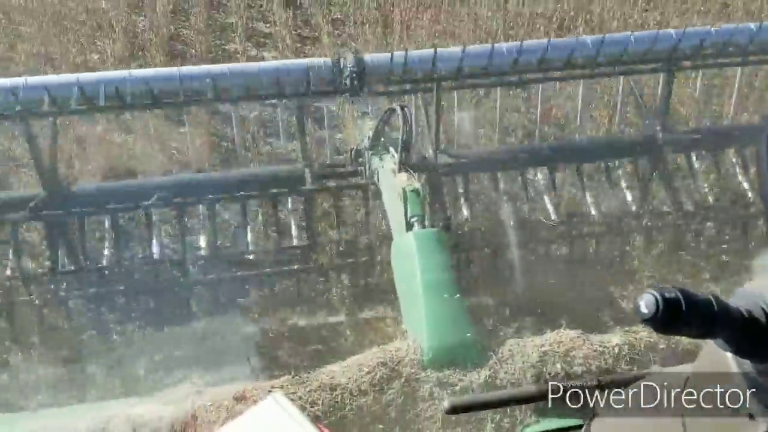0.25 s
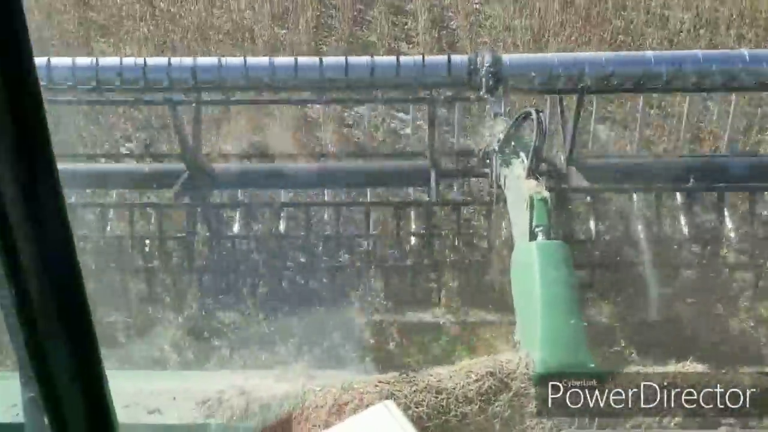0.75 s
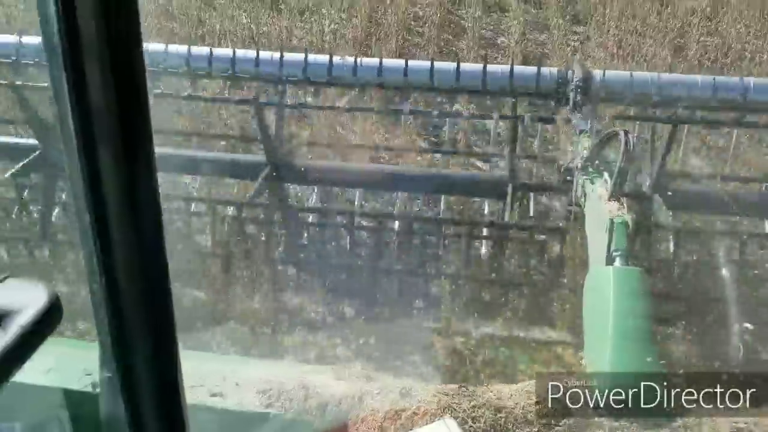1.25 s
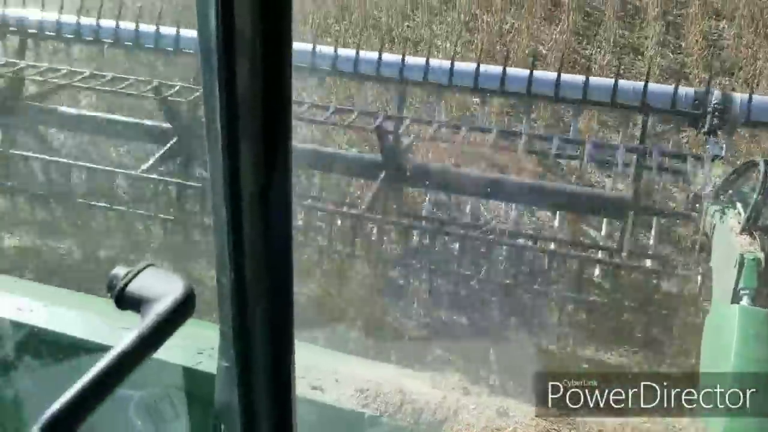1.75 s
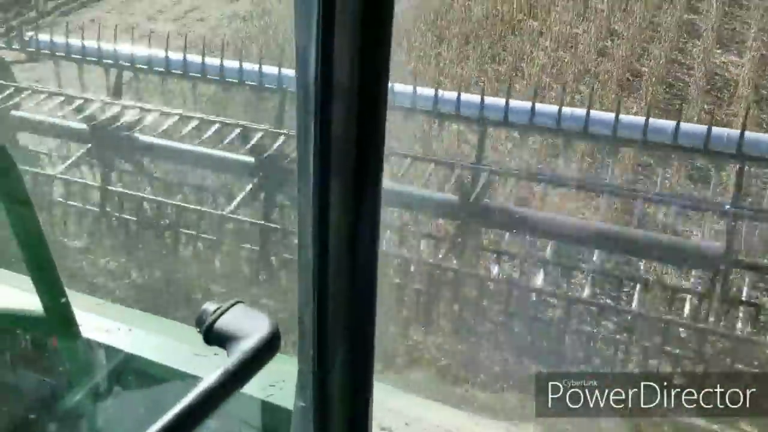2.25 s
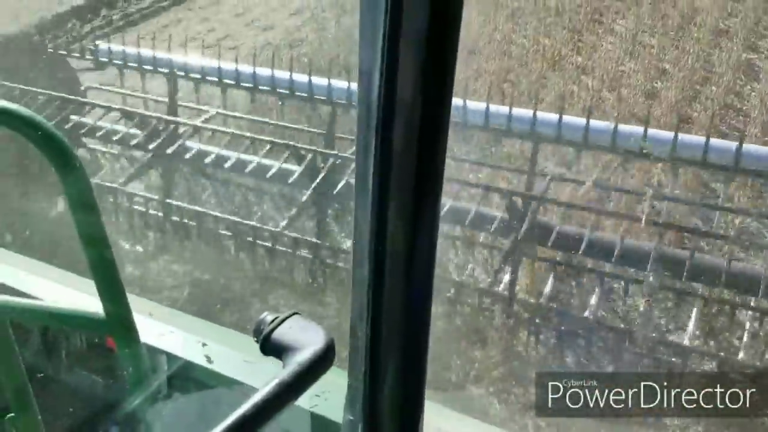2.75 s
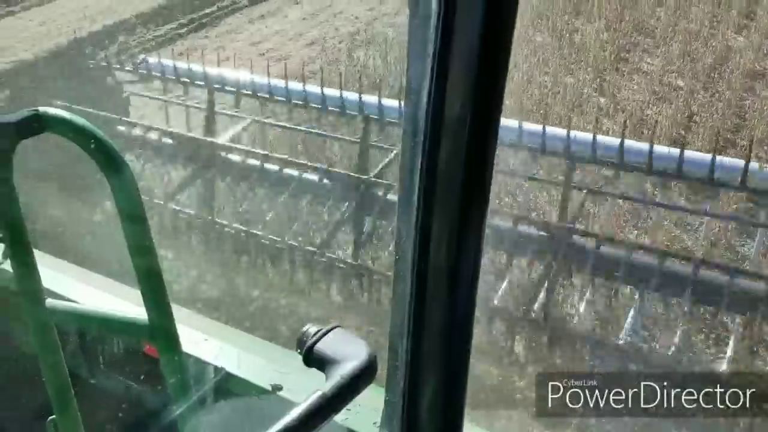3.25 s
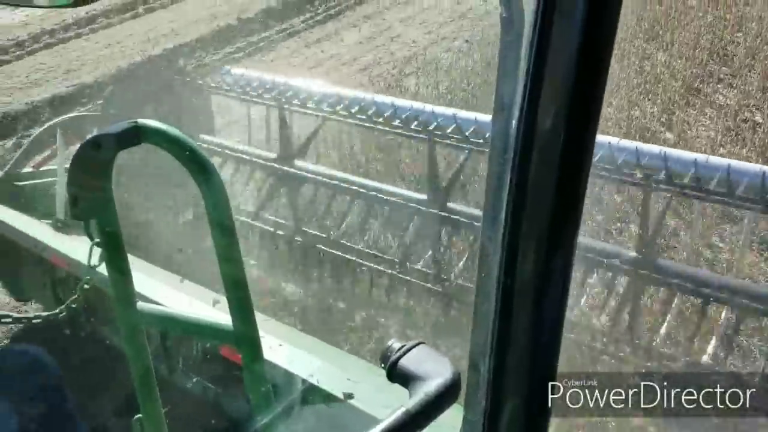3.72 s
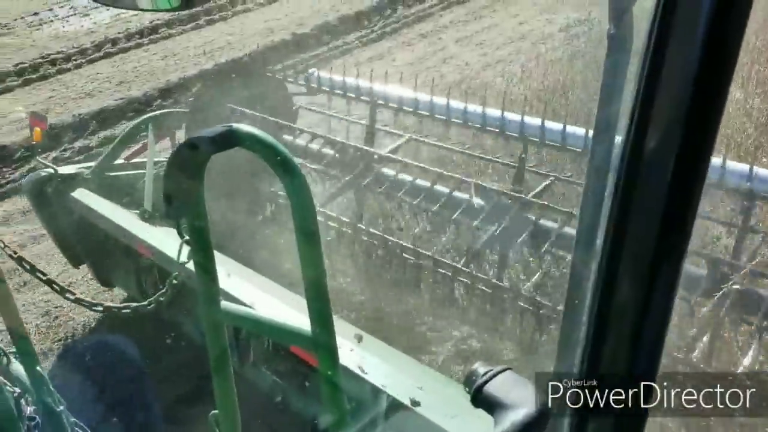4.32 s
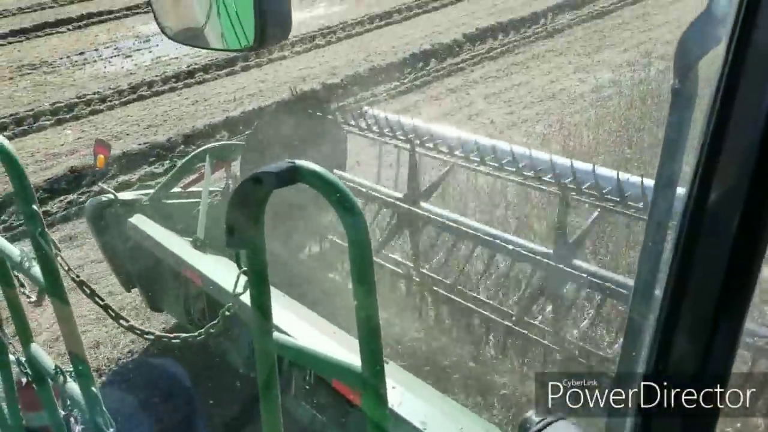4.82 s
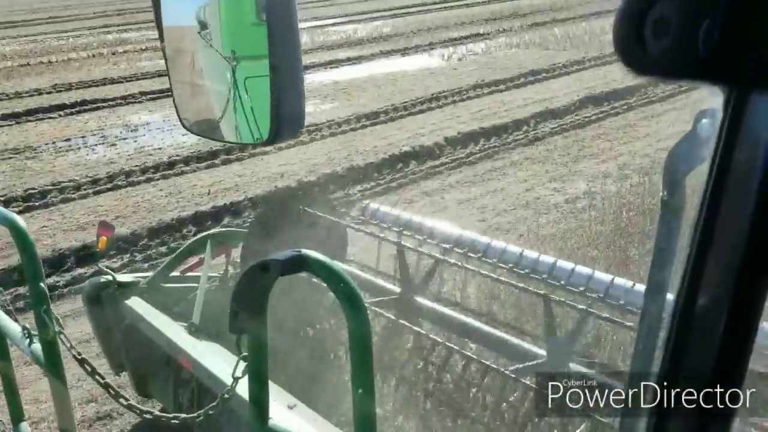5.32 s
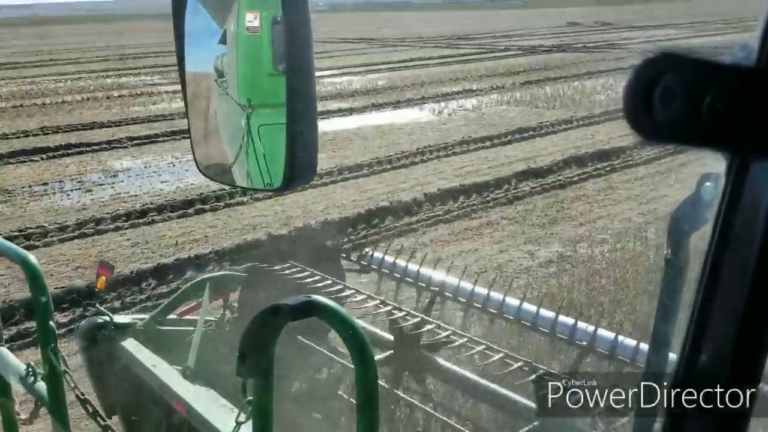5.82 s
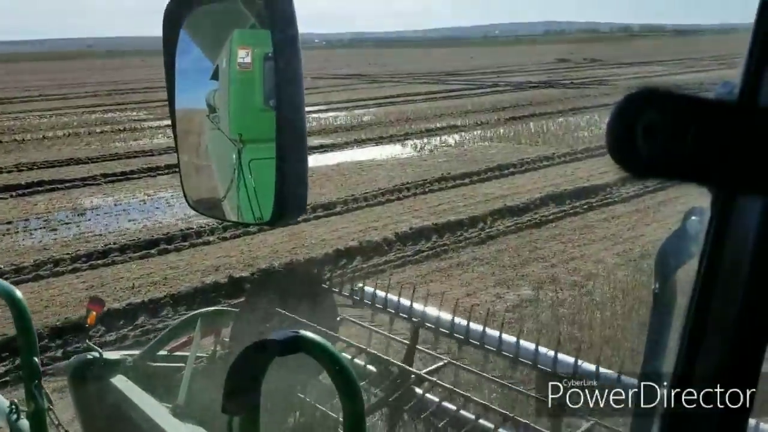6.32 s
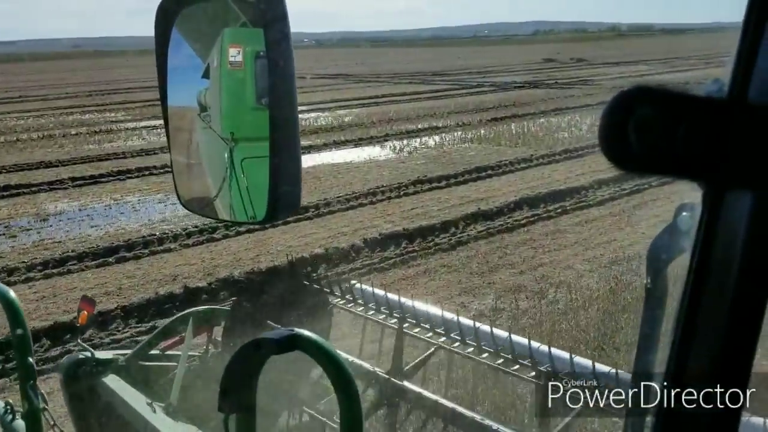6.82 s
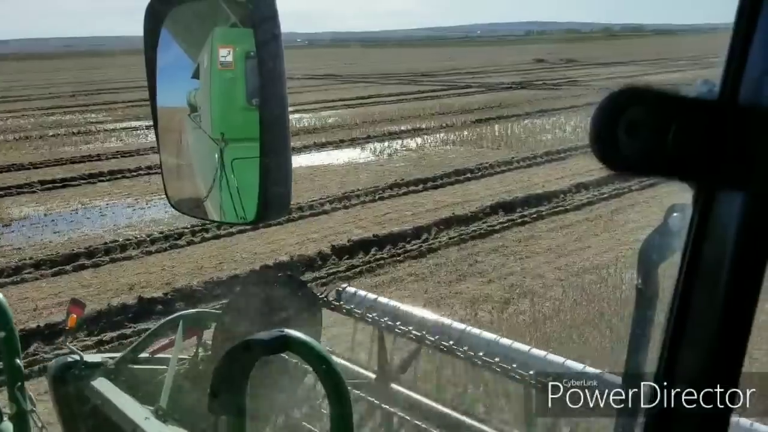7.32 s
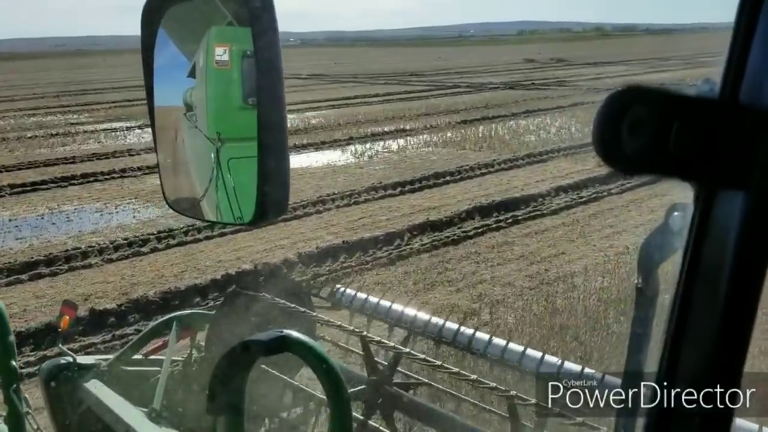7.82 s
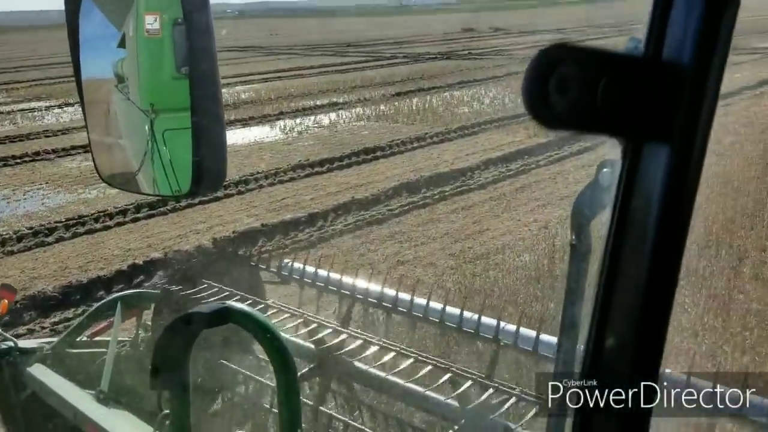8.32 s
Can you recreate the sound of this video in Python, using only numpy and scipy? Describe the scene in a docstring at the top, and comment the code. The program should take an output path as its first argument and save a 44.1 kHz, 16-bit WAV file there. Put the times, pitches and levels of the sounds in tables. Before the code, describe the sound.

The sound is continuous from 0 to 8.6 seconds inside a closed harvester cab: a dense, bass-heavy drone of engine, drums and fans, with a muffled midrange roar. Irregular deep booms pulse through it as wads of crop pass, strongest from about 0.9 to 3.8 seconds. A small bright tick sounds close by at 0.6. Dull, heavy thuds land near 2.2, 3.4, 5.2, 5.4, 5.9, 6.5, 7.2 and 8.1, with soft cab jolts between. Panels ring thinly and unsteadily; chains whirr, a pump whines faintly, and the header rustles and crackles softly under light air hiss. As the microphone turns during the first five seconds, ringing and header sounds shift sideways and the rustle changes colour. Brief dips interrupt the level around 5.6 and 6.1, the bass thinning near 6.2 before filling out again. The machine is still running at the end.

```python
"""Booms, thuds, hum and a rustling whirr fill the closed cab of a combine harvester cutting at steady speed.
Wads of crop boom and thud in the cab's air, bumps jolt it, shafts and fans hum, and a pump whines faintly.
Panels ring near 950 Hz; the header's rustle, whirr and crackle come through the windscreen.
Ringing and header sounds shift from side to side as a hand-held phone turns; something ticks once.
Filtered noise makes the broad sounds, wavering sine waves the notes, and short swells the thuds and surges."""
import sys
import numpy as np
from scipy import signal
from scipy.fft import rfft, irfft
from scipy.io import wavfile
from scipy.ndimage import uniform_filter1d

SR = 44100
rng = np.random.default_rng(int(sys.argv[2]) if len(sys.argv) > 2 else 0)


def int16_out(signal):
    """Quantize to a 16-bit WAV file."""
    q = np.round(np.clip(np.atleast_2d(signal).T, -1, 1) * 32767)
    wavfile.write(sys.argv[1], SR, q.astype(np.int16))


N = 377496
TIME = np.arange(N) / SR  # seconds
FREQ = np.maximum(np.arange(N // 2 + 1) * SR / N, 1)  # Hz

# Levels in the tables are relative: mixing may trim them further.
# What reaches the phone as it turns. Each row: time in seconds, then drone, roar, panels and header in dB.
LEVELS_AT_PHONE = [(0, -36, -35.5, -33.5, -50), (0.3, -29.5, -35, -38, -48.5),
                   (1.0, -33.5, -36, -35.5, -45), (2.2, -28, -35.5, -36, -43.5),
                   (2.95, -31, -35.5, -37.5, -46.5), (3.6, -29, -36, -38.5, -46.5),
                   (4.6, -28.5, -36, -41.5, -45.5), (5.5, -29.5, -37, -41, -48),
                   (6.05, -29, -35, -38.5, -48.5), (6.6, -28.5, -37, -41.5, -49),
                   (7.5, -30, -37.5, -40, -48.5), (8.05, -31, -36.5, -42.5, -48),
                   (8.55, -31.5, -37, -41, -48.5)]
# Slow wavering of the machinery, header, air hiss and crackle. Each row: time in seconds, change in dB.
SLOW_WAVER = [(0, 1.4), (4.5, 2.05), (5.5, 2.6), (5.7, 1.5), (6.2, -0.5), (6.6, 1), (8, 2)]
# Side-to-side shift of the header. Each row: time in seconds, lag of the left microphone in ms.
HEADER_LAG = [(0, -0.13), (1, 0.065), (2, 0.15), (3, 0.27), (4, 0.3), (5, 0.35), (6, 0.37), (8.5, 0.36)]
# Brief dips in level. Each row: middle in seconds, change in dB, half length in seconds.
LEVEL_DIPS = [(5.615, -4, 0.046), (5.784, -3.5, 0.016), (6.1, -4.5, 0.023), (6.906, -1.5, 0.032),
              (7.174, -4.5, 0.026), (7.537, -4, 0.019)]
# Brief changes, mostly drops, in the rumble.
# Each row: middle in seconds, steady boom change in dB, drone change in dB, half length in seconds.
RUMBLE_LULLS = [(0.53, -6.5, -1.5, 0.057), (0.67, -5.5, -2.5, 0.073), (0.875, -8, 0, 0.02),
                (1.12, 3, 1.5, .02), (1.435, -1, -8, 0.04), (1.61, -11, 2.5, 0.033), (2.12, -7, 0, 0.022),
                (2.405, -1, 3, 0.022), (2.53, 4, -7, 0.019), (2.66, -10, 1, 0.029), (2.93, -11, 1.5, 0.045),
                (4.77, -3, -8, 0.02), (5.54, -6, 1.5, 0.022), (5.615, -2, -11, 0.041),
                (6.9, -2.5, -10, 0.066), (7.17, -13, -2, .022), (7.37, -3, -4.5, 0.05),
                (7.98, -5, 1.5, 0.1)]
# How alike the two microphones hear the cab air. Each row: frequency in Hz, correlation from -1 to 1.
MICROPHONE_LIKENESS = [(30, 0.78), (65, 0.065), (100, 0.93), (240, 0.84), (300, 0.58), (480, 0.69),
                       (690, 0.46), (785, -0.55), (860, 0.59), (970, 0.88), (1150, 0.22), (1450, -0.66),
                       (2000, 0.15), (3000, 0.0058)]

# Hiss of ventilation air and chaff. Each row: frequency in Hz, level in dB per Hz.
HISS_COLOUR = [(900, -10), (1800, 9), (2800, 0.5), (3500, 2.5), (4500, 1), (5600, -2), (6500, -3.5),
               (7600, -9.5), (8200, -20), (9100, -18), (10500, -9.5), (12500, -7), (15400, -13.5)]
# Dry stalks snapping. Each row: frequency in Hz, level in dB per Hz.
CRACKLE_COLOUR = [(1500, -20), (2800, 12), (3700, 7), (5000, 6), (6500, -12), (8200, -33)]
# Single louder stalks. Each row: time in seconds, level in dB.
LOUD_SNAPS = [(1.263, -48), (1.318, -46), (4.265, -51), (4.714, -49), (5.17, -51)]
# Colour of the tick's scrape. Each row: frequency in Hz, level in dB per Hz.
TICK_COLOUR = [(500, -22), (1400, 0), (2200, 0), (3000, -8), (4200, -7), (5400, -7), (6600, -4), (8800, -8),
               (12400, 1), (15500, -1)]
# Ringing of the small part that ticks. Each row: frequency in Hz, width in Hz, level in dB.
TICK_RINGING = [(2000, 550, 4), (3650, 700, -3), (5090, 300, -3), (6500, 400, -5.5), (12200, 700, 0)]
# The tick's two contacts. Each row: start in seconds, level in dB, time to fall by 60 dB in seconds.
TICK_CONTACTS = [(0.5928, -28.5, 0.04), (0.5985, -38, 0.075)]
# Ringing of the auger and its trough, straight ahead. Each row: frequency in Hz, width in Hz, level in dB.
AUGER_RINGING = [(1874, 310, 0), (2790, 670, -8)]
# Ringing of the cutter bar, out to the left. Each row: frequency in Hz, width in Hz, level in dB.
KNIFE_RINGING = [(1450, 150, -6), (2096, 170, 5), (2260, 140, 1), (2402, 150, 0.5), (2600, 140, -5),
                 (3610, 210, -11.5), (4470, 150, -10.5)]
# Notes of chains and belts. Each row: pitch in Hz, level in dB, wander in Hz,
# change as the phone turns left in dB, ms added to the header's shift to give the left microphone's lead.
WHIRR_NOTES = [(877, -54, 20, -11, -0.2), (955.6, -47.5, 16, 0, -0.088), (1072, -54.5, 28, -6, -0.014),
               (1875, -60.5, 51, -7.5, 0.046), (1994, -62.5, 44, -6, 0.022), (2074, -59.5, 21.8, 0, 0.032),
               (2235, -62.5, 37, 8, 0.019), (2390, -67.5, 25.8, 2, -0.036)]
# Ringing of panels and glass. Each row: frequency in Hz, width in Hz, level in dB,
# lag of the left microphone beyond the header's in ms.
PANEL_RINGING = [(857, 99, -0.5, -0.33), (936, 82, 1.5, -0.25), (984.5, 40, -1.5, -0.17),
                 (1073, 194, -9.5, -0.072)]
# Broad roar of the threshing machinery. Each row: frequency in Hz, level in dB per Hz.
ROAR_COLOUR = [(60, -34), (150, 2.5), (270, -6), (305, 0.5), (350, 2), (410, -2.5), (480, -4), (530, -7),
               (610, -9), (675, -7.5), (760, -11.5), (1280, -19.5), (1700, -17), (4000, -46)]
# Higher ways in which the cab air rings. Each row: frequency in Hz, width in Hz, level in dB.
DRONE_RINGING = [(185.3, 41, -1), (208.7, 70, 1.5), (252, 32, -5)]
# Hum of engine, drums and fans, and the pump's whine. Each row: pitch in Hz, level in dB,
# wander in Hz, change as the phone turns left in dB.
HUM_NOTES = [(68, -39.5, .4, 0), (91.5, -38, 1.5, -2), (97.6, -37, .6, 0), (125.8, -40, .7, 2),
             (131.9, -41, .8, 2), (157.5, -38, .5, 6), (243, -42, 5, -3), (255.7, -39, .5, 3),
             (356, -50.5, 1, -5), (378, -52, 3, -2), (426, -50, 1, -5), (442.8, -51, .5, 2),
             (491.2, -54.5, 1, 4), (571.3, -51, 3.5, -2.5), (679.6, -59, 2, 2), (1905, -61.5, 2, 5),
             (4590, -73, 12, -5)]
# Swaying of the cab on its mounts. Each row: frequency in Hz, level in dB per Hz.
SWAY_COLOUR = [(5, -32), (20, -14), (35, -5.5), (52, 1), (64, 0), (85, -10), (200, -94)]
# Lowest ways in which the cab air rings. Each row: frequency in Hz, width in Hz, level in dB.
BOOM_RINGING = [(75, 13, -24), (93, 33, 0.5), (131, 40, -1.5), (148.4, 66, -6.5)]
# Steady bass under the surges and jolts. Each row: time in seconds, boom in dB, sway in dB, left minus right in dB.
STEADY_BASS = [(0, -27.5, -35, -1), (0.6, -24.5, -36, -3), (1.2, -27.5, -34.5, 1), (2.9, -24, -34.5, -0.5),
               (3.4, -25, -32.5, 1), (4.1, -23.5, -32, -2), (4.65, -25.5, -39, -1.5), (5.35, -24.5, -37, 1),
               (5.65, -28, -38, -12.5), (6.2, -36.5, -48, -21), (6.6, -26.5, -34, -2.5),
               (7.45, -29, -39, -8.5), (7.8, -26.5, -33.5, -2), (8.55, -27.5, -32, 0)]
# Bumps in the field. Each row: middle in seconds, level in dB, half length in seconds, left minus right in dB.
FIELD_JOLTS = [(2.178, -34, .05, 0), (4.036, -26, .04, 3), (4.197, -34, .05, 0), (4.525, -29, 0.032, -6),
               (4.993, -28, 0.056, 3), (5.17, -34, .04, 0), (5.7, -38, .03, 8), (5.92, -27, 0.012, -6),
               (6.328, -34, .04, -6), (7.03, -29, 0.046, 2), (7.23, -40, 0.031, 4), (8.38, -29, 0.055, 0)]
# Wads of crop in the drum. Each row: middle in seconds, level in dB, half length in seconds, pitch in Hz.
CROP_SURGES = [(0.1, -26, 0.024, 215), (0.3, -25, 0.078, 90.8), (0.85, -24.5, 0.029, 209),
               (0.948, -21, 0.02, 90.3), (1.36, -19.5, 0.058, 92.8), (1.478, -23, 0.012, 209),
               (1.486, -26, 0.018, 91), (1.692, -24, 0.026, 129.9), (1.71, -29.5, 0.055, 234.2),
               (1.907, -29, 0.042, 97), (2.246, -31, 0.058, 131), (2.334, -27, 0.023, 85),
               (2.353, -27, 0.043, 206), (2.578, -22, 0.02, 88.2), (2.775, -20, 0.056, 90.5),
               (3.078, -20, 0.024, 85.6), (3.295, -25.5, 0.094, 96), (3.53, -25, 0.045, 133.5),
               (3.74, -26, 0.021, 193.6), (3.755, -24, 0.021, 88), (5.172, -23, 0.059, 89),
               (5.42, -21, 0.011, 95.9), (6.012, -30.5, 0.018, 86), (6.494, -28, 0.03, 93.8),
               (6.602, -26, 0.03, 183.5), (6.666, -27, 0.022, 99), (6.775, -24.5, 0.027, 132),
               (7.09, -26, 0.035, 91), (7.116, -29, 0.015, 180.4), (7.24, -25, 0.022, 199),
               (7.24, -30, 0.03, 93), (7.778, -27, 0.03, 94.1), (7.896, -25, 0.023, 185.6),
               (8.123, -25, 0.025, 155), (8.252, -22.5, 0.018, 129), (8.467, -31, 0.016, 189.6),
               (8.502, -26, 0.025, 93.3)]
# Heavier lumps that knock the feeder housing. Each row: middle in seconds, peak of the swell in dB, pitch in Hz.
LUMP_THUMPS = [(2.223, -10.5, 103), (2.255, -9.5, 106), (3.412, -9, 128), (4.053, -21, 168),
               (5.154, -13, 130), (5.358, -7, 120), (5.906, -13, 57.7), (5.941, -12.5, 109),
               (6.337, -20, 142), (6.494, -13, 96), (7.207, -21, 105), (7.234, -15.5, 117),
               (8.095, -10.5, 135)]

TOP_HZ = 15400
THROB_DB, THROB_PER_S = 1.26, 6.7  # uneven feed between the surges
ROCK_DB, ROCK_PER_S = 2.5, 7.2  # small unevenness of the ground
SWAY_LEFT_DB = 1  # extra lean of the sway
SURGE_WANDER_HZ, SURGE_ROUGH_DB = 12.4, 2  # unsteadiness of a surge
NODE_HZ, NODE_WIDTH_HZ, NODE_DEPTH = 288, 33, 1  # standing wave whose quiet spot the phone leaves as it turns
TREBLE_DIP = 0.45  # share of each dip in the header, hiss and crackle
THUMP_CYCLES = 0.33  # half length of a thud
SIDES = np.array([[1], [-1]])  # left, right


def undb(db):
    """Turn decibels into gain."""
    return 10 ** (np.asarray(db) / 20)


def unit(x):
    """Scale to an average (rms) strength of 1."""
    return x / np.sqrt(np.mean(x ** 2))


def curves(table):
    """Turn the columns of a time table into curves with one value a sample."""
    s, *columns = np.transpose(table)
    return [np.interp(TIME, s, column) for column in columns]


def across(points):
    """Join (Hz, value) points by straight lines on a log-frequency axis."""
    hz, value = np.transpose(points)
    return np.interp(np.log(FREQ), np.log(hz), value)


def resonances(modes):
    """Gain of things that ring: steep-sided peaks whose powers add."""
    power = 0
    for hz, width, db in modes:
        detuning = (FREQ / hz - hz / FREQ) * hz / width
        power = power + (undb(db) / (1 + detuning ** 2)) ** 2
    return np.sqrt(power)


def colour(x, gain):
    """Filter by a gain for each frequency, then scale to rms 1."""
    return unit(irfft(rfft(x) * gain, N))


def walk(rate, order=64):
    """Smooth random drift with spread 1 that changes about rate times a second."""
    coarse = TIME[::order]  # a slow drift needs only every 64th sample
    hz = np.arange(len(coarse) // 2 + 1) * SR / N
    keep_slow = np.exp(-(hz / rate) ** 2) * (hz > 0)
    smooth = irfft(rfft(rng.standard_normal(len(coarse))) * keep_slow, len(coarse))
    return np.interp(TIME, coarse, unit(smooth))


def swell(s, db, half):
    """Gain that rises to a level and falls again."""
    return undb(db) * np.exp(-((TIME - s) / half) ** 2 / 2)


def sag(table):
    """Short flat-topped or flat-bottomed level changes in dB: one curve for each level column."""
    total = 0
    for s, *depths, half in table:
        shape = np.exp(-np.square(np.square((TIME - s) / half)))
        total = total + np.outer(depths, shape)
    return total


def spread(x, left_db):
    """Lean a sound towards the left microphone."""
    return x * undb(SIDES * left_db / 2)


def turn():
    """How far the phone has turned left: mean 0, range 1."""
    lag_ms, = curves(HEADER_LAG)
    return (lag_ms - lag_ms.mean()) / np.ptp(lag_ms)


def waver(x, share, rate):
    """Let the pitch of a two-channel sound drift by a share of itself, about rate times a second."""
    late_s = walk(rate) * share / (np.pi * rate)
    return np.array([np.interp(TIME + late_s, TIME, channel) for channel in x])


def cab_air(gain, steady=0):
    """Random vibration of the air at two microphones; steady (0-1) evens out its slow swells."""
    alike = np.clip(across(MICROPHONE_LIKENESS), -.98, .98)
    noise = rfft(rng.standard_normal((2, N)))
    # the shared part and the opposite part set how alike the channels are
    mid, side = irfft(noise * gain * np.sqrt([1 + alike, 1 - alike]), N)
    power = uniform_filter1d(mid ** 2 + side ** 2, size=SR // 11)
    return unit(np.array([mid + side, mid - side]) / power ** (np.clip(steady, 0, 1) / 2))


def arrive(gain, x, lag_ms, reflected_db):
    """Ring x in a set of resonances; it reaches one microphone first, with a diffuse cab sound added."""
    ringing = colour(x, gain)
    direct = np.array([np.interp(TIME + side * lag_ms / 2000, TIME, ringing) for side in (-1, 1)])
    return unit(direct + cab_air(gain) * undb(reflected_db))


def ventilation():
    """Air and fine chaff hiss from all round: noise whose level flickers."""
    return cab_air(undb(across(HISS_COLOUR))) * undb(-51.5 + 1.02 * walk(26))


def tick():
    """A small part close to the phone is knocked: a short bright scrape that rings in its own notes."""
    scrape = cab_air(undb(across(TICK_COLOUR)) + resonances(TICK_RINGING), steady=.8)
    out = 0
    for s, db, t60 in TICK_CONTACTS:
        age = TIME - s
        attack = np.clip(age / .0012, 0, 1)
        decay = undb(-60 * np.maximum(age - .003, 0) / t60)
        out = out + scrape * attack * decay * undb(db)
    return spread(out, left_db=-0.5)


def crackle(level_db=-58, stalks_per_s=55, scatter_db=4.0, t60=0.045):
    """Dry stalks snap in the reel: many small bursts and a few loud ones, each smeared by the cab."""
    happens = rng.random(N) < stalks_per_s / SR
    scatter = np.clip(rng.standard_normal(N), -2, 2)
    bursts = happens * undb(level_db + scatter_db * scatter)
    for s, db in LOUD_SNAPS:
        bursts[int(s * SR)] = undb(db)
    # each burst's power falls by 60 dB in t60 seconds
    power = signal.lfilter([1], [1, -undb(-120 / (t60 * SR))], bursts ** 2)
    return cab_air(undb(across(CRACKLE_COLOUR))) * np.sqrt(power)


def patter(modes, lag_ms, stroke_hz=19, stroke_depth=0.2, stalks_per_s=6000, reflected_db=-10):
    """Stalks strike ringing steel at random, a little more often at each stroke of the knife."""
    strokes = 1 + stroke_depth * np.sin(2 * np.pi * stroke_hz * TIME + walk(2.8))
    snaps = (rng.random(N) < strokes * stalks_per_s / SR) * rng.standard_normal(N)
    return arrive(resonances(modes), snaps, lag_ms, reflected_db) * undb(1.94 * walk(25))


def header(header_db, turn_db=5):
    """The header rustles; as the phone turns left the auger falls behind and the cutter bar comes forward."""
    lag_ms, = curves(HEADER_LAG)
    turned = turn()
    auger = patter(AUGER_RINGING, lag_ms) * undb(-6.5 - turn_db * turned)
    knife = patter(KNIFE_RINGING, lag_ms) * undb(-3.0 + turn_db * turned)
    return spread(auger + knife, left_db=2.1) * undb(header_db)


def whirrs(flicker_db=3.5, flicker_per_s=20, wander_per_s=11):
    """Chains and belts whirr in notes of unsteady pitch and level; each reaches one microphone first."""
    lag_ms, = curves(HEADER_LAG)
    out, turned = 0, turn()
    for hz, db, wander_hz, turn_db, aside_ms in WHIRR_NOTES:
        phase = 2 * np.pi * np.cumsum(hz + wander_hz * walk(wander_per_s)) / SR
        apart = SIDES * np.pi * hz * (lag_ms + aside_ms) / 1000
        note = np.sqrt(2) * np.sin(phase + apart)
        flicker = unit(undb(flicker_db * walk(flicker_per_s)))
        out = out + note * flicker * undb(db + turn_db * turned)
    return out


def panels(share=0.0122, rate=5, flicker_db=0.9, reflected_db=-8):
    """Each panel rings up and dies down from its own side, and its note shifts as the cab flexes."""
    lag_ms, = curves(HEADER_LAG)
    out = 0
    for hz, width, db, aside_ms in PANEL_RINGING:
        shaking = rng.standard_normal(N)
        ringing = arrive(resonances([(hz, width, 0)]), shaking, lag_ms + aside_ms, reflected_db)
        level = np.sqrt(width) * undb(db + flicker_db * walk(11.0))
        out = out + waver(ringing, share, rate) * level
    return unit(out)


def machinery(drone_db, roar_db, panel_db):
    """The threshing works drone and roar through the rear wall and keep the panels ringing."""
    feed = walk(36)  # uneven flow of crop
    drone = cab_air(resonances(DRONE_RINGING), steady=0.38) * undb(drone_db - 2.5 + 1.67 * feed)
    roar = cab_air(undb(across(ROAR_COLOUR))) * undb(roar_db + 1.0 + 1.9 * feed)
    node = irfft(rfft(roar) * resonances([(NODE_HZ, NODE_WIDTH_HZ, 0)]), N)
    roar = roar + NODE_DEPTH * turn() * node
    ringing = panels() * undb(panel_db - 2.5 + 1.6 * walk(36))
    return spread(drone, left_db=2.0) + spread(roar, left_db=0.2) + spread(ringing, left_db=-1.5)


def hums(boom_db):
    """Each turning part holds its own note; belt slip makes it wander and load makes the deep ones swell."""
    out, load_db, turned = 0, boom_db - boom_db.mean(), turn()
    for hz, db, wander_hz, turn_db in HUM_NOTES:
        phase = 2 * np.pi * np.cumsum(hz + wander_hz * walk(4.47)) / SR
        # the microphones drift through standing waves
        apart = SIDES * min(hz / 900, .6) * 0.27 * walk(1.0)
        swell_db = 2.96 * walk(5.1) + load_db / (1 + (hz / 260) ** 4)
        note = np.sqrt(2) * np.sin(phase + apart)
        out = out + note * undb(db - 2.5 + swell_db + turn_db * turned)
    return out


def thumps():
    """Each lump gives a push of a cycle or two, the same at both microphones."""
    phases = rng.uniform(0, 2 * np.pi, len(LUMP_THUMPS))
    out = 0
    for (s, db, hz), phase in zip(LUMP_THUMPS, phases):
        out = out + swell(s, db, THUMP_CYCLES / hz) * np.cos(2 * np.pi * hz * (TIME - s) + phase)
    return out


def booms():
    """Each wad sets the cab's air booming at one pitch, unsteady in pitch and level."""
    slip = 2 * np.pi * np.cumsum(SURGE_WANDER_HZ * walk(28.6)) / SR
    uneven = unit(undb(SURGE_ROUGH_DB * walk(41)))
    phases = rng.uniform(0, 2 * np.pi, len(CROP_SURGES))
    notes = 0
    for (s, db, half, hz), phase in zip(CROP_SURGES, phases):
        notes = notes + swell(s, db, half) * np.cos(2 * np.pi * hz * TIME + slip + phase)
    return np.sqrt(2) * notes * uneven * undb(-0.4)


def cab(flow, sway_db, left_db):
    """Crop surging through the drum makes the cab air boom; the cab sways and jolts on its mounts below it."""
    boom = cab_air(resonances(BOOM_RINGING), steady=.6) * flow + booms()
    mounts = cab_air(undb(across(SWAY_COLOUR)), steady=.65)
    sway = spread(undb(sway_db + ROCK_DB * walk(ROCK_PER_S)), left_db + SWAY_LEFT_DB)
    jolts = sum(spread(swell(s, db, half), lean_db) ** 2 for s, db, half, lean_db in FIELD_JOLTS)
    return spread(boom, left_db) * undb(-0.8) + mounts * np.sqrt(sway ** 2 + jolts)


def scene():
    """Mix all sources round the driver's seat."""
    drone_db, roar_db, panel_db, header_db = curves(LEVELS_AT_PHONE)
    flow_db, sway_db, bass_left_db = curves(STEADY_BASS)
    waver_db, = curves(SLOW_WAVER)
    boom_lull_db, drone_lull_db = sag(RUMBLE_LULLS)
    dip_db, = sag(LEVEL_DIPS)
    flow = undb(flow_db + boom_lull_db + THROB_DB * walk(THROB_PER_S))
    surges = sum(swell(s, db, half) for s, db, half, hz in CROP_SURGES)
    boom_db = 10 * np.log10(flow ** 2 + surges ** 2)
    # the dips go deepest in the drone and the deep hums
    works = hums(boom_db + dip_db) + machinery(drone_db + dip_db + drone_lull_db, roar_db, panel_db)
    low = cab(flow, sway_db, bass_left_db) + (works + whirrs()) * undb(waver_db)
    high = (header(header_db) + ventilation() + crackle()) * undb(waver_db)
    return low * undb(dip_db) + high * undb(TREBLE_DIP * dip_db) + thumps() + tick()


def record(dry):
    """The phone cuts the top steeply."""
    low_pass = signal.ellip(10, .2, 80, TOP_HZ, fs=SR, output="sos")
    return signal.sosfilt(low_pass, dry)


dry = scene()
out = record(dry)
int16_out(out)
```